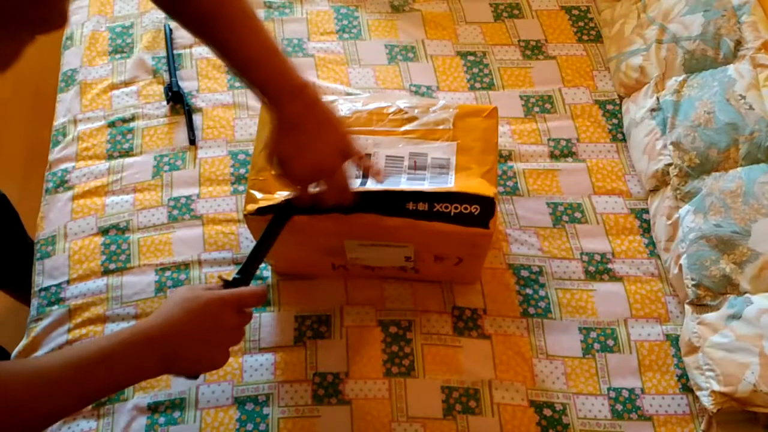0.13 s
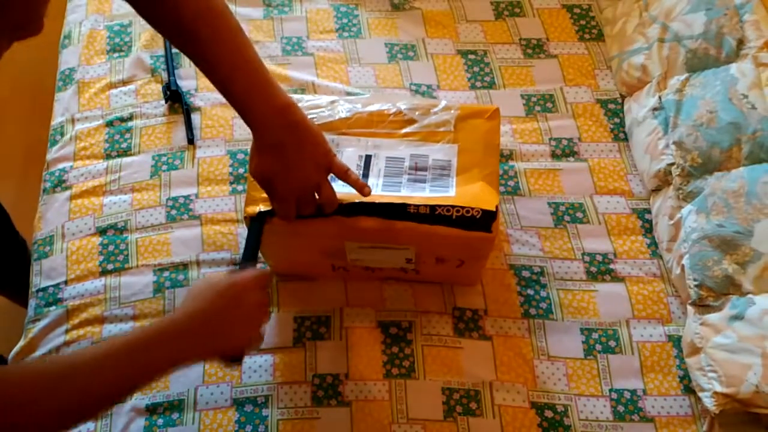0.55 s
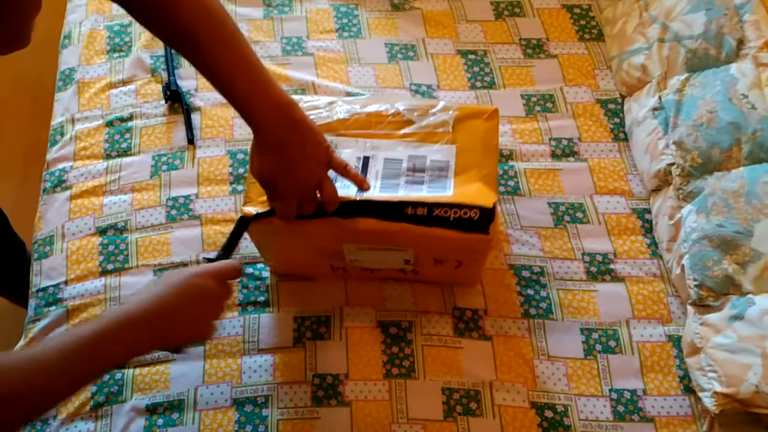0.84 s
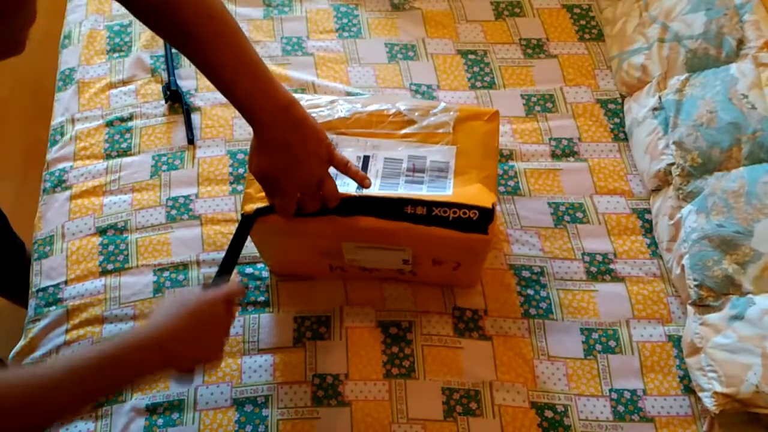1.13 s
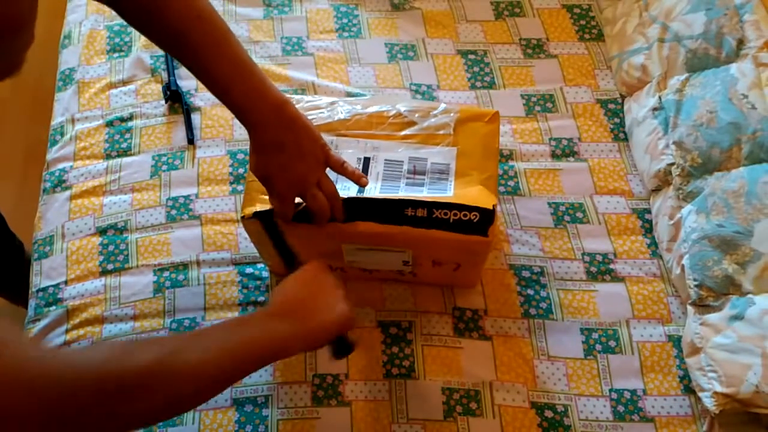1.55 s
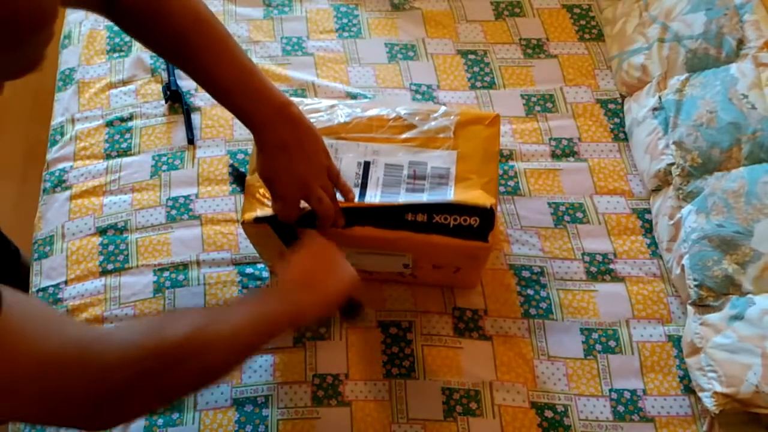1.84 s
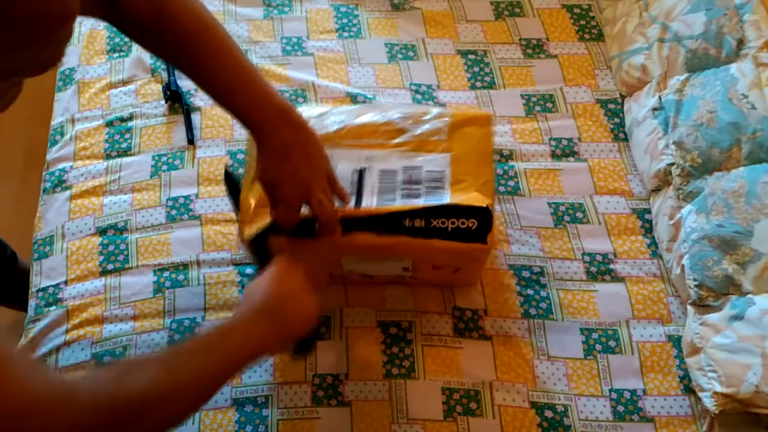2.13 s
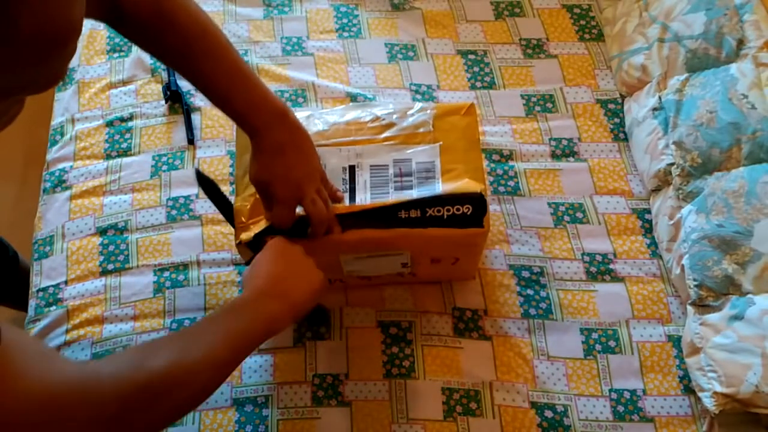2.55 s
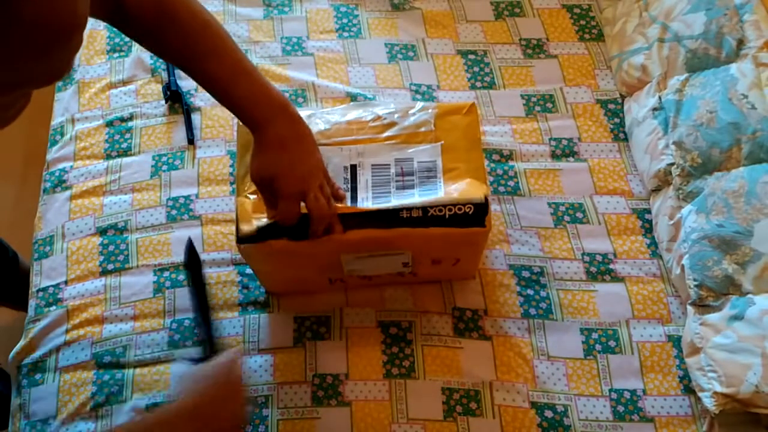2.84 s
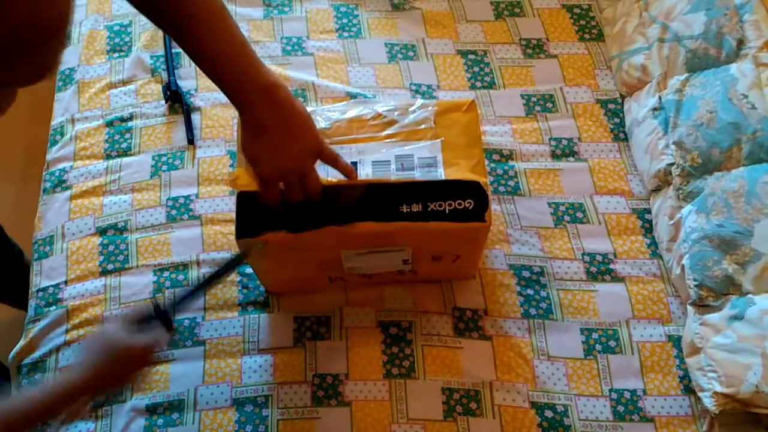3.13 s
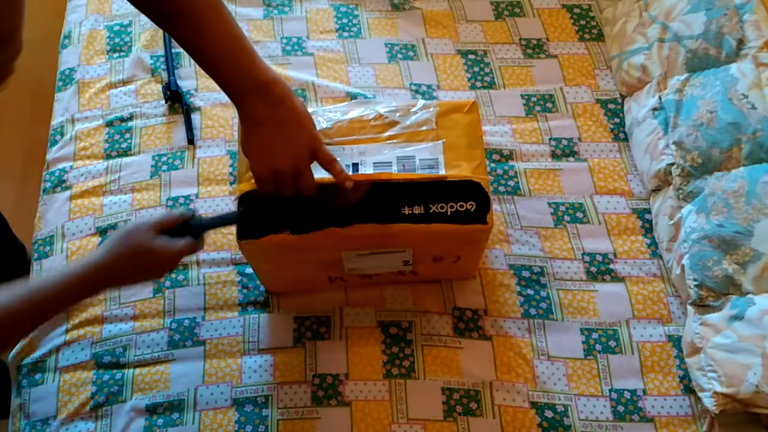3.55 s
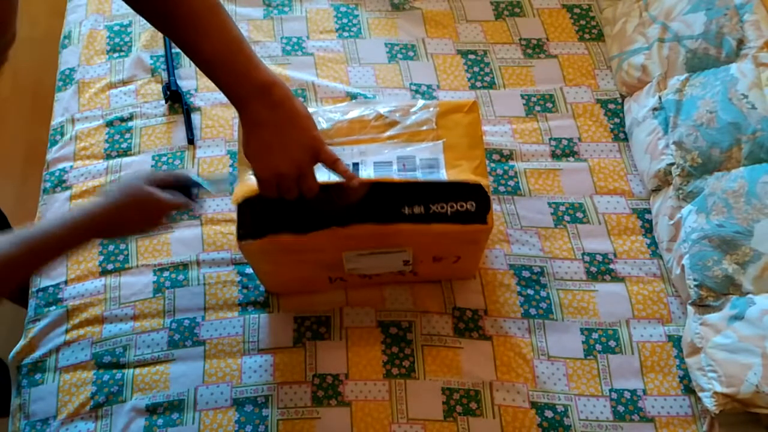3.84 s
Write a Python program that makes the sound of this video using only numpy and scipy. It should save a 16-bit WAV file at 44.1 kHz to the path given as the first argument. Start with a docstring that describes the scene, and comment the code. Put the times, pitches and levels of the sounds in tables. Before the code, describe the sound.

A knife works at a plastic-wrapped cardboard parcel in a quiet small room. Light knocks come around 0.3 seconds, then a short scrape and sharp snap near 0.8. From 1.8 to 3.3 seconds, scrapes, crinkles and snaps come thicker, with soft thumps on a mattress and faint cardboard creaks. A knock at 3.6 leads to the loudest scrape and crackle near 3.85. A faint muffled hum swells and fades behind.

```python
"""A small room, where a knife works at the taped end of a plastic-wrapped cardboard parcel on a bed.
Taut film snaps and crinkles under a hand, and the blade scrapes through tape by stick-slip friction.
Its knocks excite the damped modes of the box, which thumps on the mattress and groans as it flexes.
A muffled drone swells and fades behind the room's steady rumble and hiss."""
import sys
import numpy as np
from scipy import signal
from scipy.fft import rfft, irfft, next_fast_len
from scipy.io import wavfile
from scipy.ndimage import map_coordinates

SR = 44100
rng = np.random.default_rng(int(sys.argv[2]) if len(sys.argv) > 2 else 0)


def wav_record(signal):
    """Record a signal, one row per channel, as 16-bit PCM in the file named by sys.argv[1]."""
    frames = np.transpose(np.atleast_2d(signal))
    bounded = np.clip(frames, -1, 1)
    # unit amplitude maps onto the largest positive 16-bit level
    quanta = np.round(bounded * 32767).astype(np.int16)
    wavfile.write(sys.argv[1], SR, quanta)


N = 176400


def amp(db):
    return 10 ** (np.asarray(db) / 20)

def unit_rms(x):
    return x / np.sqrt(np.mean(x ** 2) + 1e-20)

def unit_hit(x):
    """Energy normalisation: a hit gets the energy of 5 ms at rms 1."""
    return x / np.linalg.norm(x) * np.sqrt(.005 * SR)

def at_frequency(points, hz):
    """Interpolation of (frequency [Hz], value) points on a logarithmic axis."""
    frequencies, values = np.transpose(points)
    return np.interp(np.log(hz + 1), np.log(frequencies + 1), values)

def envelope(points):
    """Amplitude envelope through (time [s], level [dB]) points."""
    return amp(np.interp(np.arange(N) / SR, *np.transpose(points)))

def add(track, start, x):
    """Superposition of x on the track from a start time in seconds."""
    part = track[max(round(start * SR), 0):][:len(x)]
    part += x[:len(part)]

def colour(x, points):
    """Minimum-phase filtering by a (frequency [Hz], gain [dB]) response."""
    size = 2048
    gain = amp(at_frequency(points, np.fft.rfftfreq(size * 2, 1 / SR)))
    cepstrum = irfft(np.log(gain))
    cepstrum[1:size] *= 2
    cepstrum[size + 1:] = 0
    return signal.fftconvolve(x, irfft(np.exp(rfft(cepstrum))))[:len(x)]

def band(x, low_hz, high_hz, order=3):
    """Band-pass filtering with a maximally flat passband."""
    high_hz = np.clip(high_hz, low_hz * 1.1, SR * .48)
    return signal.sosfilt(signal.butter(order, [low_hz, high_hz], "band", fs=SR, output="sos"), x)

def wobble(rate):
    """Smooth random modulation: a spline through `rate` knots a second."""
    knots = rng.standard_normal(int(N * rate / SR) + 4)
    return map_coordinates(knots, [np.arange(N) * rate / SR])

def narrowband(phase, width_hz):
    """Random modulation of amplitude and phase spreads a tone into a narrow band."""
    modulation = (wobble(width_hz) + 1j * wobble(width_hz))[:len(phase)]
    return unit_rms(np.real(modulation * np.exp(1j * phase)))

def slips(size, per_s, spread_db):
    """Shot noise: independent impulses of random sign and strength."""
    impulses = (rng.random(size) < per_s / SR) * np.sign(rng.standard_normal(size))
    return impulses * amp(spread_db * np.clip(rng.standard_normal(size), -2, 2))

# Reverberation time of the room: (frequency [Hz], T60 [s])
ROOM_DECAY = [(100, 0.12), (600, 0.43), (3000, 0.36), (7000, 0.34), (14000, 0.29)]

def room_tail(build_s=.0098):
    """Diffuse reverberation: noise of energy 1 builds up, then decays exponentially in each band."""
    hz, times, spectra = signal.stft(rng.standard_normal(SR // 2), SR, nperseg=256)
    decay = amp(-60 * times / at_frequency(ROOM_DECAY, hz)[:, None])
    tail = signal.istft(spectra * decay, SR, nperseg=256)[1][:SR // 2]
    tail *= 1 - np.exp(-(np.arange(len(tail)) / SR / build_s) ** 2)
    return tail / np.linalg.norm(tail)

def room(x, tail_db=-2, early_db=-4, early_s=.0088):
    """Convolution with the direct path, early reflections off box and arm, and reverberation."""
    t = np.arange(SR // 2) / SR
    early = rng.standard_normal(len(t)) ** 3 * t * np.exp(-2 * (t / early_s) ** 2)
    response = amp(tail_db) * room_tail() + amp(early_db) * early / np.linalg.norm(early)
    response[0] += 1
    return signal.fftconvolve(x, response)[:N]

# Spectrum of the room's rumble: (frequency [Hz], relative level [dB])
RUMBLE_SPECTRUM = [(20, -32), (31, -7.5), (45, -16), (62, 4), (78, 1.5), (98, -13.5), (200, -16.5),
                   (400, -22), (800, -31), (1400, -36), (14000, -39)]
# Spectrum of the room's hiss: (frequency [Hz], relative level [dB])
HISS_SPECTRUM = [(300, -3), (1000, -17), (1500, -9), (2200, -17), (4500, -21), (7000, -7), (14000, 3)]

def noise_floor(rumble_db=-58, hiss_db=-66.5):
    """Stationary coloured noise: the room's low rumble and faint hiss."""
    rumble = unit_rms(colour(rng.standard_normal(N), RUMBLE_SPECTRUM))
    hiss = unit_rms(colour(rng.standard_normal(N), HISS_SPECTRUM))
    return amp(rumble_db) * rumble + amp(hiss_db) * hiss

# Swell of the drone: (time [s], level [dB])
DRONE_SWELL = [(0, -67.5), (.8, -68), (1.1, -57.5), (1.5, -62), (1.95, -61), (2.35, -70.5), (2.8, -65.5),
               (3.15, -53.5), (3.5, -56.5), (4, -49)]
# Spectrum of the drone's noise: (frequency [Hz], relative level [dB])
DRONE_SPECTRUM = [(40, -56.5), (100, 0), (165, 0), (255, 2.5), (310, -9.5), (410, -15.5), (520, -31.5),
                  (1200, -43)]
# Tones in the drone: (frequency [Hz], level re the noise [dB]), and their bandwidth
DRONE_TONES, TONE_WIDTH_HZ = [(163, -7.5), (253, -8.5), (325, -14), (403, -17)], 11

def drone():
    """Slow amplitude modulation: muffled noise and wavering tones swell and fade together."""
    t = np.arange(N) / SR
    tones = sum(amp(db) * narrowband(2 * np.pi * hz * t, TONE_WIDTH_HZ) for hz, db in DRONE_TONES)
    noise = unit_rms(colour(rng.standard_normal(N), DRONE_SPECTRUM))
    return envelope(DRONE_SWELL) * (noise + tones)

# Crinkling of the wrapping: (time [s], level [dB])
CRINKLE_LEVEL = [(0, -69), (.2, -61), (.45, -74.5), (.75, -73), (1.0, -64.5), (1.3, -79), (1.5, -64),
                 (1.65, -71.5), (2.05, -60), (2.4, -62), (2.6, -58), (2.9, -59.5), (3.3, -66), (3.57, -72),
                 (3.78, -66), (4, -50)]
# Spectrum of the crinkling: (frequency [Hz], relative level [dB])
CRINKLE_SPECTRUM = [(200, -39), (1500, -25), (2100, -4.5), (3000, -6.5), (5000, -6), (7000, 1),
                    (14000, -4.5)]

def film_crinkle(clump_db=3, clumps_per_s=30):
    """Crackling noise: the wrapping yields under the holding hand in clusters of tiny impulses."""
    grains = slips(N, per_s=700, spread_db=9) * amp(clump_db * wobble(clumps_per_s))
    return room(envelope(CRINKLE_LEVEL) * unit_rms(colour(grains, CRINKLE_SPECTRUM)))

# Snaps of tape and film, and at 2.279 s a light knock of the blade on the box: (time [s], level [dB], low edge
# [Hz], high edge [Hz], decay time [s])
FILM_SNAPS = [(.057, -48, 3470, 11000, 0.019), (0.069, -50, 4900, 10000, 0.0082),
              (.361, -58, 3020, 6840, 0.0067), (0.829, -38.5, 1470, 5070, 0.011),
              (0.948, -43.5, 2600, 8240, 0.0063), (1.037, -55, 3020, 7800, 0.0021),
              (1.166, -57.5, 1480, 2720, 0.023), (1.352, -48, 3500, 8200, 0.0053),
              (1.509, -51.5, 5760, 8700, 0.0086), (1.537, -60, 5100, 8040, 0.0025),
              (1.662, -52, 2700, 7500, 0.0045), (1.742, -53, 2480, 8300, 0.013),
              (1.781, -48, 3000, 8100, 0.006), (2.025, -48.5, 2920, 6860, 0.013),
              (2.071, -40, 1750, 5470, 0.0079), (2.117, -46, 1950, 6650, 0.012),
              (2.134, -45, 1940, 6400, 0.014), (2.278, -37, 2730, 7800, 0.0057),
              (2.279, -42, 420, 2200, 0.0049), (2.298, -40.5, 3050, 7800, 0.0072),
              (2.499, -41, 2980, 8200, 0.006), (2.646, -33, 2100, 3830, 0.0053),
              (2.648, -47.5, 5000, 11000, 0.0094), (2.79, -42.5, 3400, 9000, 0.009),
              (2.807, -39, 2420, 4630, 0.0073), (2.835, -46.5, 2970, 9050, 0.0054),
              (2.963, -41, 3440, 8050, 0.0096), (3.066, -40.5, 1000, 5500, 0.01),
              (3.067, -40, 4100, 8640, 0.00073), (3.111, -53, 4860, 8800, 0.0018),
              (3.172, -46.5, 3050, 7840, .004), (3.4123, -43, 4340, 10000, 0.0087),
              (3.596, -52.5, 3550, 8450, 0.0098), (3.704, -47, 4260, 7100, 0.0072),
              (3.746, -53.5, 5200, 8800, 0.0043), (3.825, -44, 4000, 10900, .002),
              (3.827, -37, 1980, 7000, 0.0071), (3.849, -44, 5740, 8200, .003),
              (3.8551, -30, 5000, 8600, 0.0004), (3.8576, -30.5, 1500, 7060, 0.006),
              (3.922, -42, 2500, 9500, 0.0024), (3.973, -38.5, 2400, 4370, 0.0059)]

def film_snaps(slip_db=13, reflection_s=.006, tail_db=-2):
    """Sudden release of tension: film gives way in one slip, then crackle, reflections and a tail. The light
    knock of the blade at 2.279 s is played the same way, in a lower band."""
    out, t = np.zeros(N), np.arange(SR // 2) / SR
    for start, db, low_hz, high_hz, decay_s in FILM_SNAPS:
        crackle = np.exp(-(t / decay_s) ** 1.3)
        reflections = .15 * np.exp(-t / reflection_s)
        burst = rng.standard_normal(len(t)) * (crackle + reflections)
        burst[0] = amp(slip_db)
        direct = unit_hit(band(burst, low_hz, high_hz, order=2))
        tail = unit_hit(band(room_tail(), low_hz, high_hz, order=2))
        add(out, start, amp(db) * (direct + amp(tail_db) * tail))
    return out

# Strokes of the blade:
# (time [s], rise [s], hold [s], level [dB], low edge [Hz], high edge [Hz], box re friction [dB])
BLADE_STROKES = [(0.119, 0.06, 0.076, -60.5, 3750, 9700, -10.5),
                 (0.581, 0.02, 0.0066, -53.5, 2000, 7400, -18), (0.796, 0.018, 0.094, -48, 2140, 7800, -15),
                 (0.91, 0.0072, 0.039, -54, 2300, 7900, -18), (1.021, 0.014, 0.091, -66.5, 2130, 7600, -27),
                 (1.397, 0.016, 0.011, -65.5, 5000, 8500, -12),
                 (1.782, 0.0078, 0.051, -55, 2370, 7000, -2.5), (1.931, 0.04, 0.048, -68, 2500, 8000, -2.5),
                 (1.861, 0.019, 0.029, -48.5, 1940, 8400, -14), (2.449, 0.01, 0.02, -57, 1920, 7900, 1),
                 (2.485, 0.01, 0.014, -45.5, 1880, 6600, -10), (2.516, 0.0025, 0.028, -55, 1790, 6500, 6),
                 (2.662, 0.0056, 0.019, -48.5, 1880, 8750, -3.5), (2.824, .01, 0.024, -53, 2070, 6850, -30),
                 (3.155, 0.044, 0.026, -47.5, 2210, 9700, -9), (3.184, 0.017, 0.021, -52, 970, 1880, -12),
                 (3.238, 0.0065, 0.0085, -55.5, 1510, 8500, 1.5),
                 (3.844, 0.01, 0.047, -40.5, 1660, 9100, -5.5),
                 (3.909, 0.0068, 0.012, -45.5, 1760, 7000, -17)]
# Response of the box to a stroke: (frequency [Hz], gain [dB])
BOX_RESPONSE = [(60, -44), (170, 13.5), (250, 4.5), (340, -3), (520, 2), (800, -2), (1150, -0.5),
                (1700, -13), (3000, -24), (8000, -95)]

def blade_scrapes(release_s=.0044):
    """Stick-slip friction: the edge drags through tape and film and forces the box to vibrate."""
    out, t = np.zeros(N), np.arange(SR // 2) / SR
    for start, rise, hold, db, low_hz, high_hz, box_db in BLADE_STROKES:
        pressure = np.minimum(t / rise, 1) * np.exp(-np.maximum(t - rise - hold, 0) / release_s)
        drag = slips(len(t), per_s=9000, spread_db=4)
        friction = unit_rms(band(drag, low_hz, high_hz, order=2))
        box = amp(box_db) * unit_rms(colour(drag, BOX_RESPONSE))
        add(out, start, amp(db) * room(pressure * (friction + box)))
    return out

# Blade on the box: (time [s], level [dB], high edge [Hz], panel mode [Hz], rebound delay [s])
BLADE_KNOCKS = [(.160, -62, 1240, 1070, 0.0021), (.2703, -38, 2980, 1107, 0.002),
                (.3595, -40, 2400, 1065, 0.0017), (.512, -46.5, 1640, 820, 0.0011),
                (.602, -55.5, 1670, 1090, 0.0015), (1.783, -48.5, 1190, 663, 0.0027),
                (1.816, -44.5, 447, 242, 0.0079), (1.893, -47.5, 1100, 520, 0.0037),
                (2.21, -57.5, 1700, 1090, 0.0018), (2.502, -43, 2420, 1240, .002),
                (2.648, -36.5, 2680, 640, .0045), (2.837, -57, 1710, 1290, 0.0023),
                (2.997, -57.5, 1570, 1130, 0.00213), (3.184, -46, 1740, 1070, 0.0018),
                (3.6246, -36.5, 1240, 820, 0.0034), (3.821, -38.5, 2100, 1620, 0.0031),
                (3.856, -39.5, 2550, 1270, 0.0022), (3.876, -37.5, 990, 600, 0.00172)]
# Modes of the cardboard box: (frequency [Hz], relative level [dB], T60 [s])
BOX_MODES = [(170, -3.5, 0.057), (326, -13, 0.2), (490, -3, 0.025), (608, -1, .04), (750, -8, .03),
             (1420, 9.5, 0.0077), (1890, -2, 0.02), (2530, 9.5, 0.017), (3850, 1, 0.014)]

def blade_knocks(panel_db=4.5, panel_t60=.029, crack_db=12, crack_t60=.033, rebound=.7):
    """Impact excitation of damped modes: the blade strikes and rebounds; softer contact is duller."""
    out, t = np.zeros(N), np.arange(SR // 10) / SR
    for start, db, high_hz, panel_hz, rebound_s in BLADE_KNOCKS:
        modes = list(BOX_MODES) + [(panel_hz, panel_db, panel_t60)]
        contacts = np.zeros(len(t))
        for delay, strength in ((0, 1), (rebound_s, rebound)):
            ring = np.zeros(len(t))
            for hz, mode_db, t60 in modes:
                # Rough cardboard: the phase takes a random walk, 22 radians rms after a second.
                drift = 22 * np.cumsum(rng.standard_normal(len(t))) / np.sqrt(SR)
                ring += amp(mode_db - 60 * t / t60) * np.sin(2 * np.pi * hz * t + drift)
            crack = amp(crack_db - 60 * t / crack_t60) * rng.standard_normal(len(t))
            add(contacts, delay, strength * (ring + crack))
        knock = unit_hit(band(contacts, low_hz=68, high_hz=high_hz))
        add(out, start, amp(db) * room(knock, tail_db=-13))
        # The other sides of the box radiate a broadband tail into the room.
        broad_tail = unit_hit(band(room_tail(), low_hz=300, high_hz=high_hz))
        add(out, start, amp(db - 3) * broad_tail)
    return out

# Pushes of the box into the mattress: (time [s], level [dB], frequency [Hz])
MATTRESS_THUMPS = [(0.181, -52, 77), (0.27, -46, 181.4), (0.362, -45, 62), (0.363, -48.5, 169.3),
                   (1.11, -44, 149.6), (1.223, -39.5, 65.6), (1.225, -45.5, 123), (1.88, -43.5, 72.6),
                   (2.116, -48, 68.8), (2.172, -46.5, 72.7), (2.529, -41, 62), (2.655, -37.5, 75),
                   (2.651, -43, 125), (2.771, -42.5, 109.5), (2.955, -43, 75.3), (3.704, -37, 70.5),
                   (3.848, -34, 65.4), (3.886, -40, 168)]

def mattress_thumps(rise_s=.0082, t60=.27):
    """Damped oscillation: each soft push of the box on the mattress rings at one low frequency."""
    out, t = np.zeros(N), np.arange(SR // 2) / SR
    onset = 1 - np.exp(-t / rise_s)
    for start, db, hz in MATTRESS_THUMPS:
        add(out, start, amp(db - 60 * t / t60) * onset * np.sin(2 * np.pi * hz * t))
    return out

# Groans of the box: (time [s], duration [s], level [dB], start frequency [Hz], end frequency [Hz])
BOX_GROANS = [(1.785, 0.036, -57, 421, 283), (1.89, 0.12, -59.5, 183, 153), (1.921, .06, -67.5, 728, 688),
              (1.935, .14, -63.5, 400.6, 312), (2.513, .05, -55.5, 277, 224)]

def box_groans():
    """Friction-driven resonance: the gripped box shifts, its pitch gliding as the cardboard flexes."""
    out = np.zeros(N)
    for start, duration, db, start_hz, end_hz in BOX_GROANS:
        progress = np.arange(int(duration * SR)) / (duration * SR)
        phase = 2 * np.pi * np.cumsum(start_hz + (end_hz - start_hz) * progress) / SR
        swell = np.sqrt(np.sin(np.pi * progress))
        add(out, start, amp(db) * swell * narrowband(phase, width_hz=65))
    return room(out)

def scene():
    """Linear superposition of all sources in one channel."""
    background = noise_floor() + drone()
    wrapping = film_crinkle() + film_snaps() + blade_scrapes()
    box = blade_knocks() + mattress_thumps() + box_groans()
    return (background + wrapping + box)[None]

# Response of the microphone: (frequency [Hz], gain [dB])
MIC_RESPONSE = [(20, 0), (4500, 0), (5500, .5), (6500, 3), (8000, 0), (10000, -6), (14000, -13)]

def record(dry, cutoff_hz=14500):
    """Frequency response of a small microphone: a presence peak and a steep band limit."""
    size = next_fast_len(N + SR // 2)
    passband = np.fft.rfftfreq(size, 1 / SR) < cutoff_hz
    spectrum = rfft(colour(dry[0], MIC_RESPONSE), size)
    return irfft(spectrum * passband, size)[None, :N]


dry = scene()
out = record(dry)
wav_record(out)
```